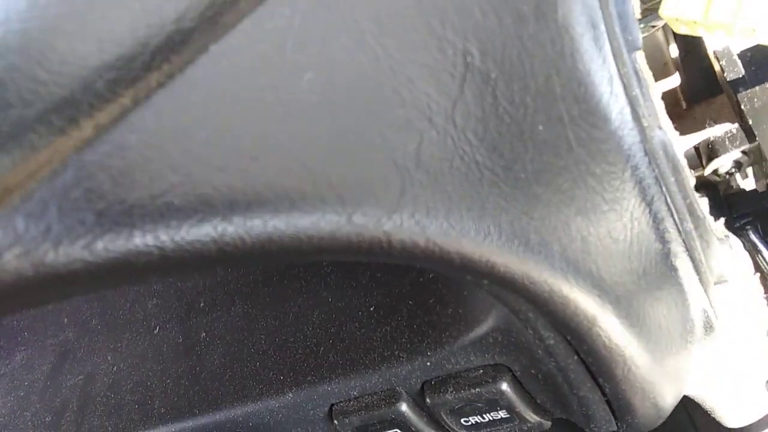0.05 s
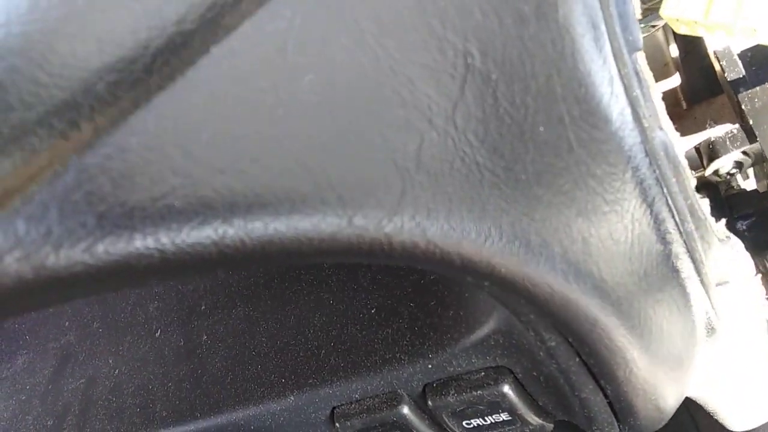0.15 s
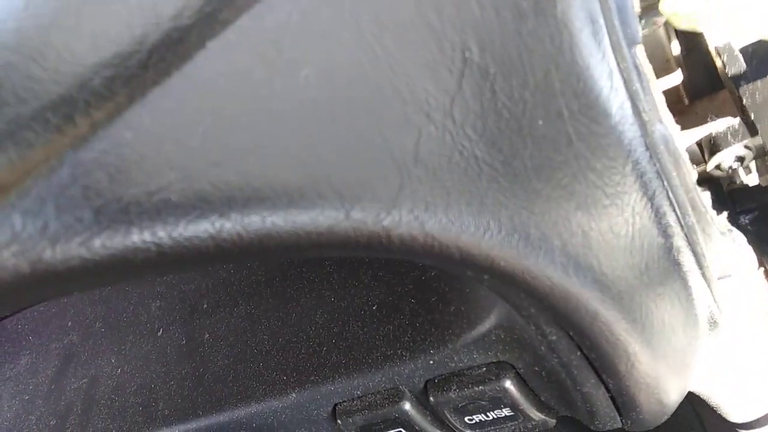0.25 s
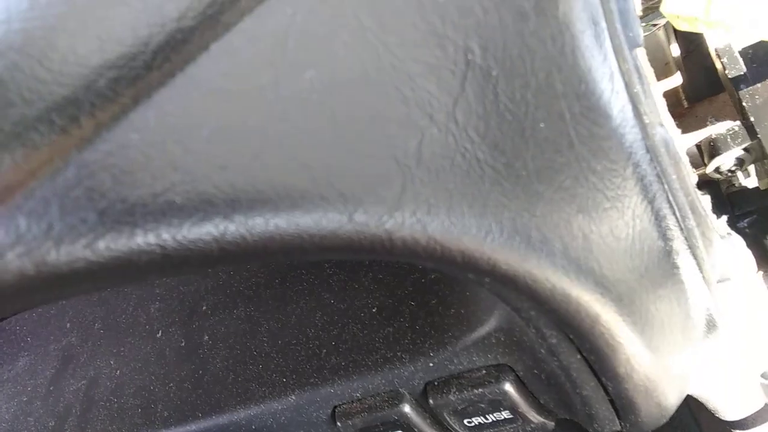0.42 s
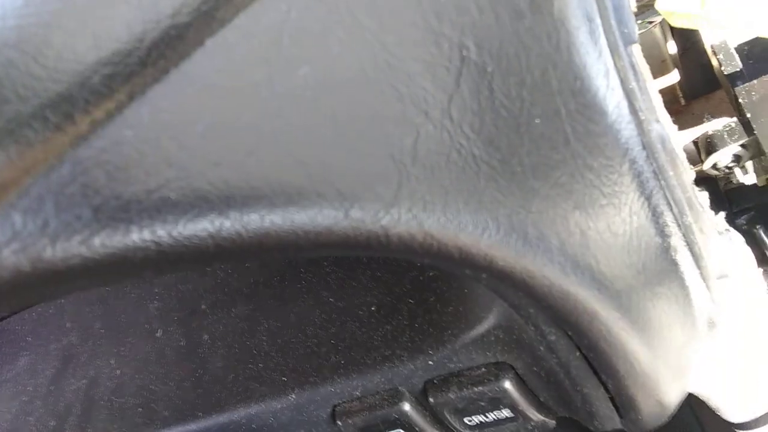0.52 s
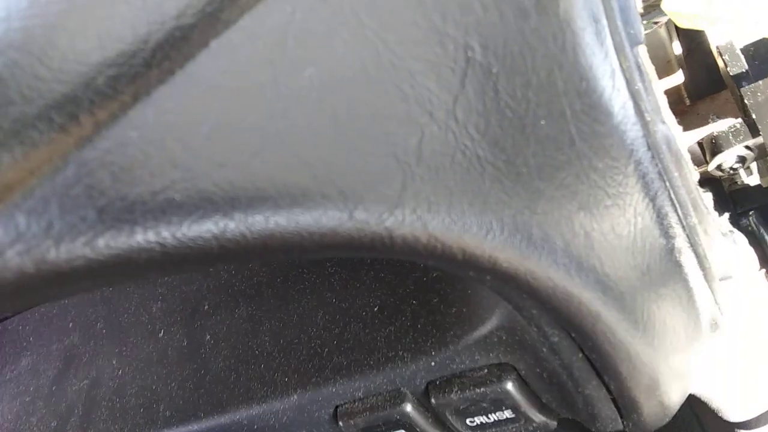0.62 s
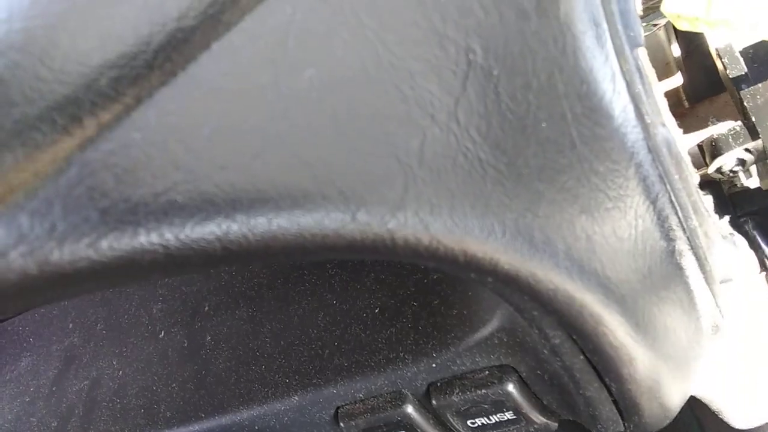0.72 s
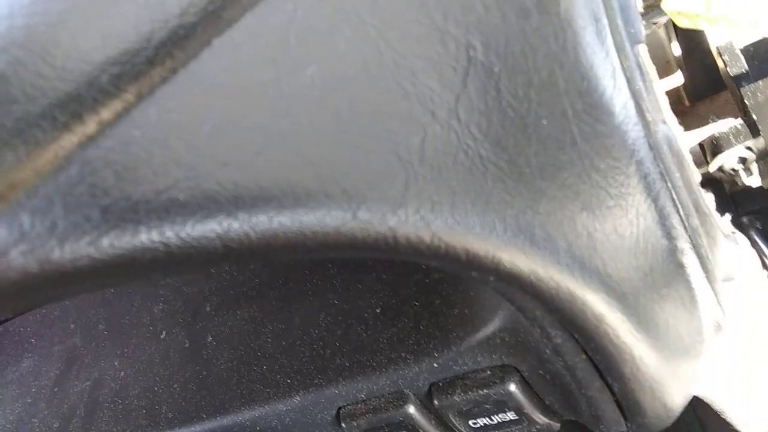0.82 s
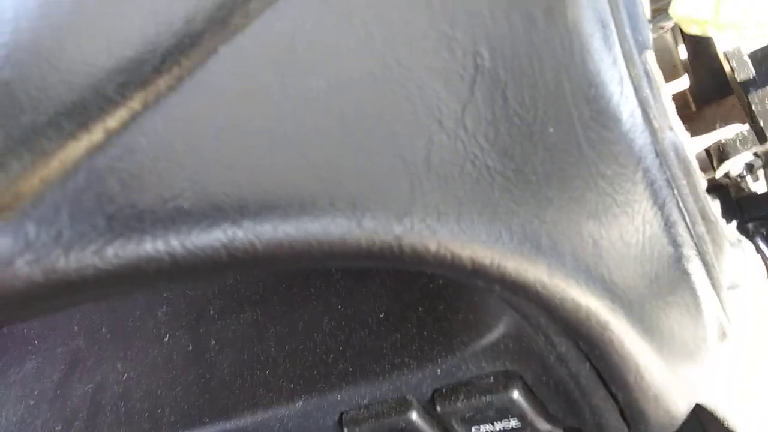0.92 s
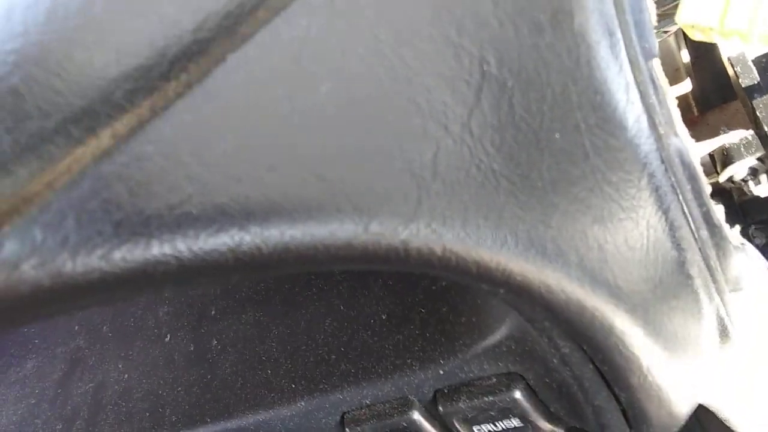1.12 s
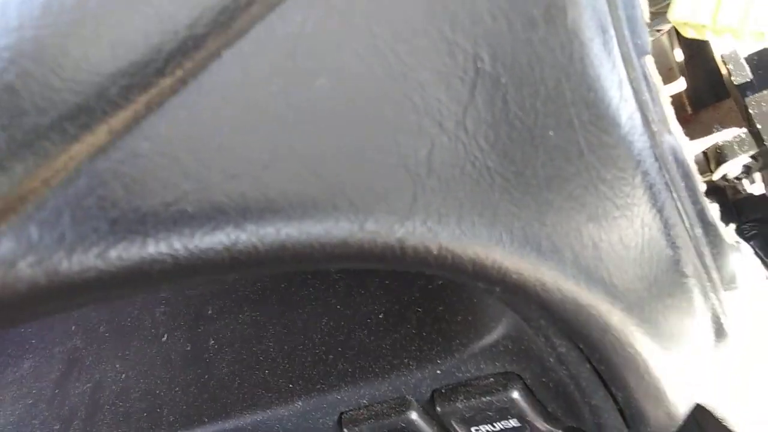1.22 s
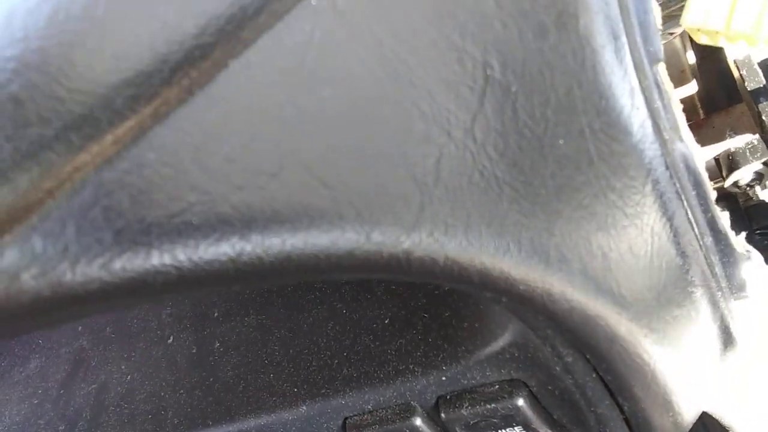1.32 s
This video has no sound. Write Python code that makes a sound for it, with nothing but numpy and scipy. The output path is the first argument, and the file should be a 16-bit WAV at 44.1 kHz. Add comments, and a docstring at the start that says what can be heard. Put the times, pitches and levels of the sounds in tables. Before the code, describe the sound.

Metal pliers-like clamp clicking and clinking against a screw in a car's plastic dashboard, close up

```python
"""A steel hemostat picks at electrical tape on a screw in a car's dashboard, close to the microphone.
Its jaws rub, tick and slip off the screw; each contact rings tool and trim (steel and panel modes plus
shaped noise), and rubbing is a dense run of tiny contacts. Dull knocks on the plastic come from the
handling. The padded cabin adds a short noise tail over a faint, filtered-noise hiss."""
import sys
import numpy as np
from scipy import signal
from scipy.fft import rfft, irfft
from scipy.io import wavfile
from scipy.ndimage import uniform_filter1d

SR = 44100
rng = np.random.default_rng(int(sys.argv[2]) if len(sys.argv) > 2 else 0)


def persist_wave(psi):
    """Save psi, clipped to +-1, as 16-bit WAV."""
    counts = np.round(np.clip(psi, -1, 1) * 32767).astype(np.int16)
    wavfile.write(sys.argv[1], SR, np.atleast_2d(counts).T)


N = 59535  # samples
RING_T = np.arange(8192) / SR  # time within one ring, s


def undb(db):
    """Turn decibels into a gain."""
    return 10 ** (np.asarray(db) / 20)


def fade(t60):
    """Die away like a ring that loses 60 dB in t60 seconds."""
    return np.exp(-np.log(1000) * RING_T / t60)


def on_log(hz, points):
    """Read (f/Hz, value) points on a log-frequency axis."""
    points = np.array(points)
    return np.interp(np.log(hz + 1), np.log(points[:, 0]), points[:, 1])


def colour(x, points, size=2048):
    """Filter through (f/Hz, level/dB) points, with no sound ahead of its cause (minimum phase)."""
    log_gain = np.log(undb(on_log(np.fft.rfftfreq(size, 1 / SR), points)))
    cepstrum = irfft(log_gain)
    # folding the second half onto the first makes the filter causal
    cepstrum[1:size // 2] *= 2
    cepstrum[size // 2 + 1:] = 0
    response = irfft(np.exp(rfft(cepstrum)))
    return signal.fftconvolve(x, response)[:len(x)]


def sloped(hz, dbs, below, above):
    """Carry (f/Hz, level/dB) points on for two octaves past both ends, in dB per octave."""
    return [(hz[0] / 4, dbs[0] + 2 * below), *zip(hz, dbs), (hz[-1] * 4, dbs[-1] + 2 * above)]


def add(out, start, x):
    """Mix a sound in at its time."""
    i = int(start * SR)
    out[i:i + len(x)] += x[:len(out) - i]


def even(x):
    """Smooth away chance humps in the noise spectrum, so that only the modes colour it."""
    spectrum = rfft(x, 2 * len(x))
    bins_per_hz = 2 * len(x) / SR
    narrow, wide = (uniform_filter1d(abs(spectrum) ** 2, size=int(hz * bins_per_hz)) for hz in (130, 1500))
    return irfft(spectrum * np.sqrt(wide / narrow))[:len(x)]


# tone of the background hiss: f/Hz, relative level/dB (per Hz)
HISS_TONE = [(30, -28), (110, -15.5), (160, -19), (200, -12), (400, -7.5), (780, -6), (1200, -5.5),
             (2400, -8.5), (4600, -11.5), (9000, -17.5), (16000, -17.5)]
HISS_DB = -67  # overall level before the bandwidth limit


def hiss():
    """The faint, even background of the cabin: steady random noise through a tone filter."""
    x = colour(rng.standard_normal(N), HISS_TONE)
    return x * undb(HISS_DB) / np.std(x)


# how long the trim's dense vibration lasts before the grip shortens it: f/Hz, t60/s
TRIM_RING_T60 = [(200, 0.17), (600, 0.11), (1400, 0.083), (3700, 0.056), (10000, 0.039)]
TRIM_DB, CRACK_DB, CABIN_DB = -2.5, 2, -37.5  # relative levels
CRACK_T60_S, CABIN_T60_S = 0.024, 0.19  # the crack's is before the grip shortens it


def trim(decay):
    """Dense vibration as noise, band by band: a crack, a short ring and the cabin's tail."""
    hz = np.fft.rfftfreq(len(RING_T), 1 / SR)
    edges = np.r_[0, np.geomspace(350, SR / 2, 7)][:, None]
    lo, hi = edges[:-1], edges[1:]
    ring = undb(TRIM_DB) * fade(decay * on_log((lo + hi) / 2, TRIM_RING_T60))
    crack = undb(CRACK_DB) * fade(CRACK_T60_S * decay)
    cabin = undb(CABIN_DB) * fade(CABIN_T60_S)
    power = ring ** 2 + crack ** 2 + cabin ** 2
    noise = rfft(rng.standard_normal(len(RING_T)))
    bands = irfft(noise * ((hz >= lo) & (hz < hi))) * np.sqrt(power)
    # give each band the energy its width and fade call for, whatever the random draw
    wanted = power.sum(axis=1) * (hi - lo)[:, 0] / (SR / 2)
    return even(np.sqrt(wanted / (bands ** 2).sum(axis=1)) @ bands)


# natural ringing tones of the plastic panel around the screw, one list per column:
# f/Hz, relative level/dB, t60/s before the grip shortens it
PANEL_F = [205, 325, 555, 720, 792, 1056, 1243, 1598, 1860]
PANEL_LEVEL = [-21.5, -21, -32, -26.5, -13.5, -23.5, -11.5, -20, -26]
PANEL_T60 = [.11, .09, .07, .07, .075, .07, .058, .052, .05]
# the same for the hemostat held against the screw: f/Hz, relative level/dB, t60/s before the grip
STEEL_F = [2049, 2459, 2987, 3289, 3594, 3941, 4110, 4470, 4720, 5390, 5782, 5993, 6320]
STEEL_LEVEL = [-21, -13, -11, -20, -8, -23, -8.5, -18, -24, -9.5, -33.5, -19.5, -7]
STEEL_T60 = [.05, .062, .048, .048, .028, .04, .032, .04, .042, .04, .042, .055, .033]
BEND_DELAY_S = .0008  # travel time of a 1 kHz bending wave; higher ones arrive sooner


def modes(decay):
    """Panel and steel modes start as their bending waves arrive and die fast while the jaws grip."""
    hz = np.array(PANEL_F + STEEL_F)[:, None]
    db = np.array(PANEL_LEVEL + STEEL_LEVEL)[:, None]
    t60 = np.array(PANEL_T60 + STEEL_T60)[:, None] * min(decay, 1)
    t = np.maximum(RING_T - BEND_DELAY_S * np.sqrt(1000 / hz), 0)
    tones = undb(db) * np.sin(2 * np.pi * hz * t) * np.exp(-np.log(1000) * t / t60)
    return tones.sum(axis=0)


VALLEY_DB, PEAK_WIDTH_HZ, PEAK_WIDTH_SHARE = -8, 25, .028  # peak width = Hz + share of its frequency


def gather(x):
    """Deepen the valleys between the modes, so the noise gathers around their frequencies."""
    hz, peaks = np.arange(100, 7000, 10), np.array(PANEL_F + STEEL_F)[:, None]
    width = PEAK_WIDTH_HZ + PEAK_WIDTH_SHARE * peaks
    near = np.exp(-((hz - peaks) / width) ** 2).max(axis=0)
    depth = np.interp(hz, [6400, 6900], [1, 0])  # no valleys above the highest mode
    return colour(x, np.c_[hz, VALLEY_DB * (1 - near) * depth])


def blow(points, contact_s, ring, decay):
    """One contact: the vibration builds up over the contact time, coloured by how it lands."""
    build_up = 1 - np.exp(-2 * RING_T / contact_s)
    return colour((gather(trim(decay)) + ring) * build_up, points)


# tone points shared by knocks and rubs: f/Hz
KNOCK_F = [300, 850, 2200, 5500]
KNOCK_TOP_DB_PER_OCT = -19
# jaws rubbing on tape and screw: t/s, length/s, then filter level/dB at each of KNOCK_F
RUB_EVENTS = [ (.170, 0.029, -74, -61, -50.5, -55), (0.195, 0.072, -60, -41.5, -49, -47),
              (.255, 0.095, -65.5, -55.5, -64.5, -57.5), (0.356, 0.022, -55, -52.5, -55, -58),
              (.518, 0.064, -70.5, -54, -53.5, -53.5), (.605, 0.051, -58, -58, -52, -55),
              (0.736, 0.036, -64, -44.5, -53.5, -62), (0.83, 0.042, -38, -37, -47, -59),
              (1.184, 0.077, -53, -44.5, -55, -60), (1.235, 0.0579, -43.5, -44.5, -52, -58.5)]
RUB_GRAINS_PER_S, RUB_SCATTER_DB, RUB_FADE_S = 1600, 4, 0.0032
RUB_RING_DB, RUB_DECAY = -7, 0.47  # RUB_DECAY scales the trim's fade


def rubbing():
    """Dense, uneven stick-slip grains ring the same parts while the jaws slide."""
    out, ring = np.zeros(N), undb(RUB_RING_DB) * modes(0.79)
    size = len(RING_T)
    for start, length, *dbs in RUB_EVENTS:
        hits = rng.random(size) < RUB_GRAINS_PER_S / SR
        strength = undb(RUB_SCATTER_DB * rng.standard_normal(size))
        direction = rng.choice([-1, 1], size)
        stroke = np.clip(np.minimum(RING_T, length - RING_T) / RUB_FADE_S, 0, 1)
        grains = hits * strength * direction * stroke
        rub = signal.fftconvolve(grains, gather(trim(RUB_DECAY)) + ring)[:size]
        rub *= np.sqrt(length * SR / np.sum(rub ** 2))  # equal strength before the filter
        add(out, start, colour(rub, sloped(KNOCK_F, dbs, 0, KNOCK_TOP_DB_PER_OCT)))
    return out


# dull knocks on the trim: t/s, then filter level/dB at each of KNOCK_F
KNOCK_EVENTS = [ (0.341, -60, -31.5, -34, -43.5), (0.374, -51, -39, -29.5, -45.5),
                (.639, -58, -25.5, -76, -48), (0.65, -39, -30.5, -43, -41), (.766, -35, -18, -52, -43.5),
                (0.867, -36, -47, -60, -45.5), (0.903, -47, -38, -47.5, -49), (.984, -58, -45, -53.5, -59),
                (1.091, -34.5, -38, -44.5, -53), (1.098, -35.5, -32, -57, -51),
                (1.138, -42.5, -30, -52.5, -59), (1.2031, -32.5, -38, -40.5, -50),
                (1.208, -28, -35, -36.5, -72), (1.241, -57, -26, -51, -47), (1.259, -30, -40, -35, -48)]
KNOCK_DECAY, KNOCK_RING_DB, KNOCK_CONTACT_S = 0.74, -7, .0014


def knocks():
    """Handling bumps the plastic: a longer contact and a steep loss of treble sound dull."""
    out, ring = np.zeros(N), undb(KNOCK_RING_DB) * modes(0.84)
    for start, *dbs in KNOCK_EVENTS:
        points = sloped(KNOCK_F, dbs, 0, KNOCK_TOP_DB_PER_OCT)
        add(out, start, blow(points, KNOCK_CONTACT_S, ring, KNOCK_DECAY))
    return out


TOP_DB_PER_OCT = -18.5  # shared by ticks and slips
# tone points of the ticks: f/Hz
TICK_F = [2200, 5700, 11000]
# light touches of the steel tips: t/s, then filter level/dB at each of TICK_F
TICK_EVENTS = [ (0.1393, -68, -36.5, -50), (0.1677, -58, -37.5, -51), (0.1718, -71, -31, -65),
               (0.2744, -36, -22.5, -50), (.5452, -29.5, -33.5, -45), (0.5673, -47.5, -34, -57),
               (0.5744, -41, -33, -67), (0.636, -46, -30, -54.5), (.6464, -39.5, -28, -64),
               (.843, -30, -23.5, -38), (1.1124, -41.5, -41, -60.5), (1.1725, -73, -51, -67)]
TICK_DECAY, TICK_RING_DB, TICK_CONTACT_S, TICK_BASS_DB_PER_OCT = 0.47, -6.5, .00015, -9.5


def ticks():
    """Light steel touches: a very short contact and a strongly damped ring sound thin and bright."""
    out, ring = np.zeros(N), undb(TICK_RING_DB) * modes(TICK_DECAY)
    for start, *dbs in TICK_EVENTS:
        points = sloped(TICK_F, dbs, TICK_BASS_DB_PER_OCT, TOP_DB_PER_OCT)
        add(out, start, blow(points, TICK_CONTACT_S, ring, TICK_DECAY))
    return out


# tone points of the slips: f/Hz
SLIP_F = [280, 850, 2000, 3700, 6000, 10500]
# hard slips of the jaws: t/s, contact time/s, filter level/dB at each of SLIP_F,
# ring level/dB (before the filter), decay scale of the trim's noise (no unit)
SLIP_EVENTS = [ (.218, .0008, -27.5, -15, -15, -1.5, -6.5, -28, -2.5, 0.71),
               (0.5797, 0.00027, -35, -20.5, -11.5, -11.5, -28, -58.5, -2, 0.7),
               (0.7593, 0.00092, -26, -15.5, -22, -34.5, -23, -55, -37, 0.73),
               (0.8463, 0.00054, -29.5, -21, -18, -19, -15, -37.5, -13, 0.88),
               (1.225, 0.0014, -25.5, -22.5, -22, -22, -20.5, -43, -37, 0.77),
               (1.272, 0.00016, -38, -31, -20.5, -28, -46, -65, -16, 0.43)]
SLIP_BASS_DB_PER_OCT = -15


def slips():
    """The jaws slip off the screw: each slip has its own contact time, tone, ring and decay."""
    out, ring = np.zeros(N), modes(0.84)
    for start, contact_s, *dbs, ring_db, decay in SLIP_EVENTS:
        points = sloped(SLIP_F, dbs, SLIP_BASS_DB_PER_OCT, TOP_DB_PER_OCT)
        add(out, start, blow(points, contact_s, undb(ring_db) * ring, decay))
    return out


LOW_CUT_HZ, TOP_HZ = 196, 15900


def scene():
    """The work on the screw, thin in the bass, over the background."""
    low_cut = signal.butter(3, LOW_CUT_HZ, "high", fs=SR, output="sos")
    work = signal.sosfilt(low_cut, rubbing() + knocks() + ticks() + slips())
    return (hiss() + work)[None]  # one channel


def record(dry):
    """The recorder cuts the top with a steep low-pass filter."""
    top_cut = signal.ellip(8, .2, 70, TOP_HZ, fs=SR, output="sos")  # ripple dB, stopband dB
    return signal.sosfilt(top_cut, dry)


dry = scene()
out = record(dry)
persist_wave(out)
```